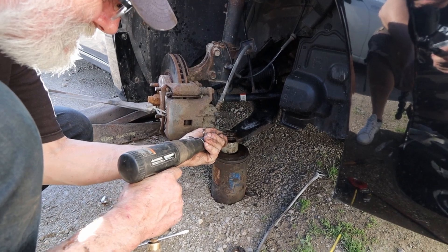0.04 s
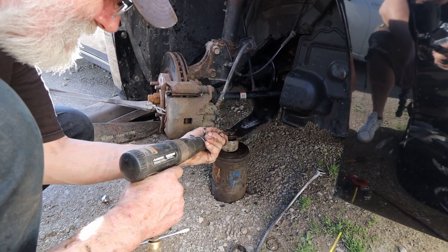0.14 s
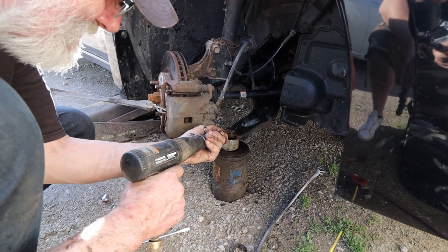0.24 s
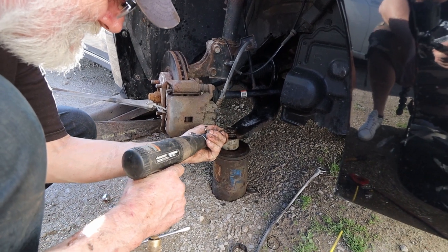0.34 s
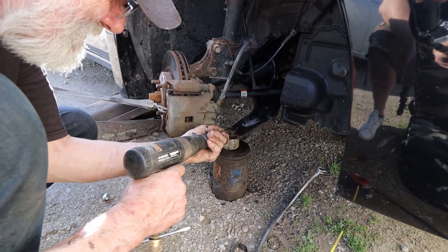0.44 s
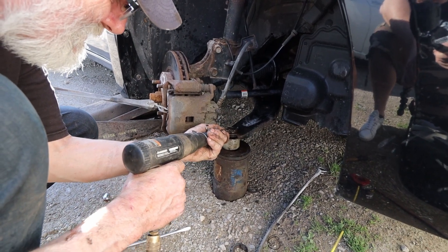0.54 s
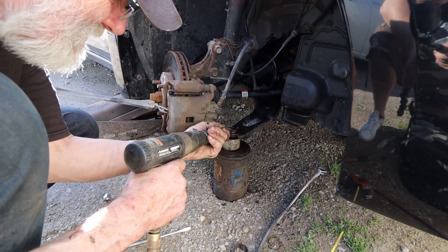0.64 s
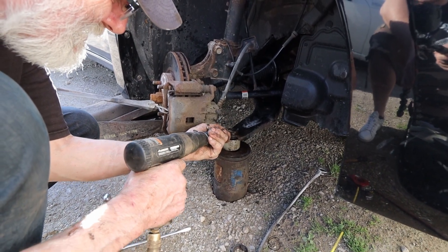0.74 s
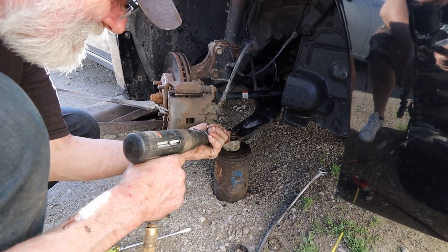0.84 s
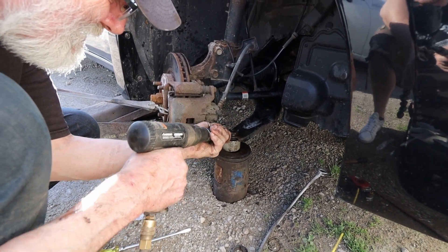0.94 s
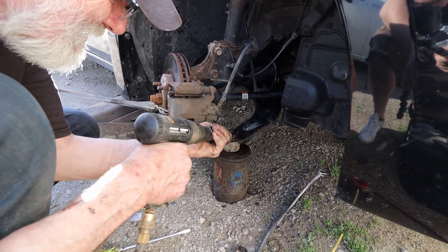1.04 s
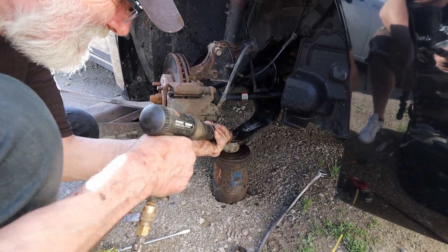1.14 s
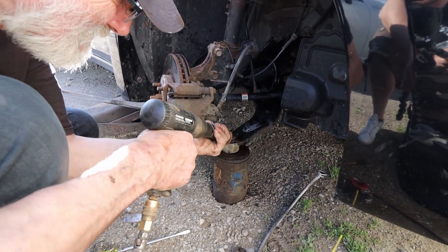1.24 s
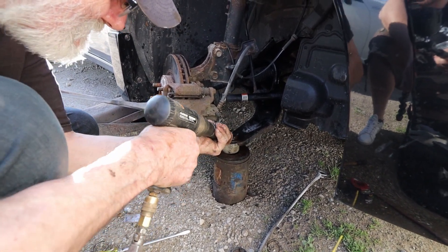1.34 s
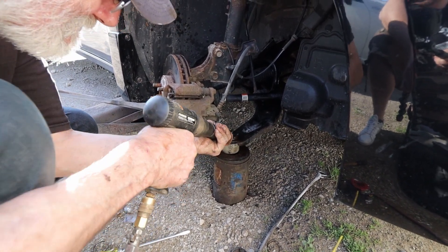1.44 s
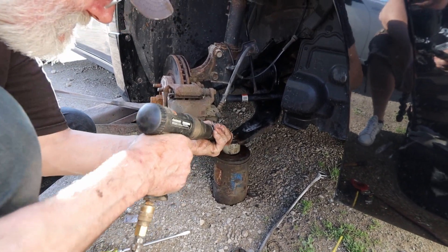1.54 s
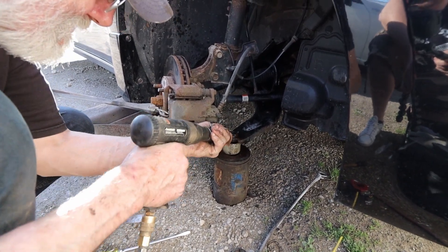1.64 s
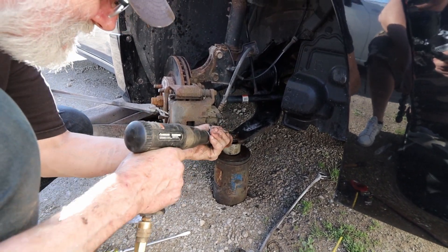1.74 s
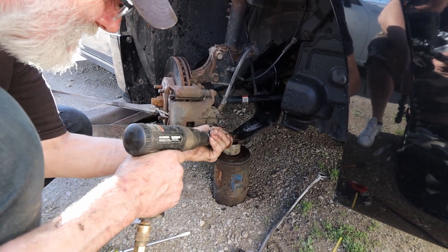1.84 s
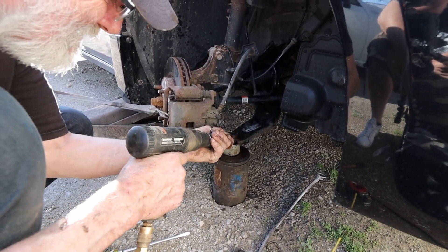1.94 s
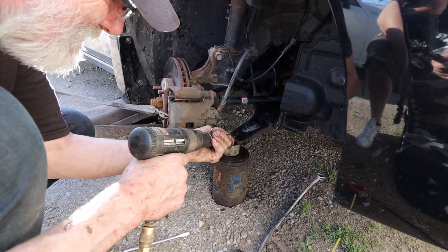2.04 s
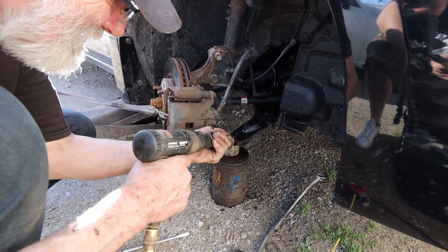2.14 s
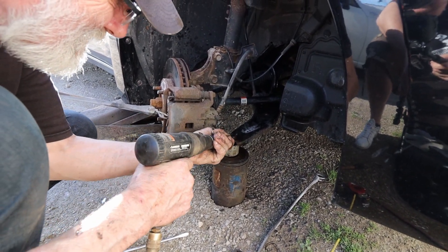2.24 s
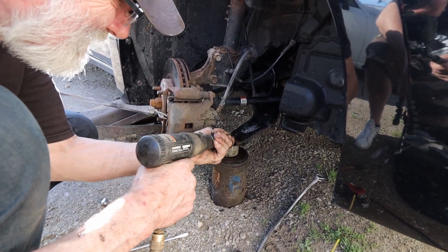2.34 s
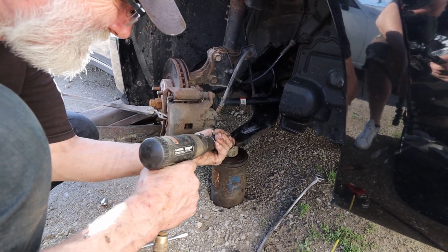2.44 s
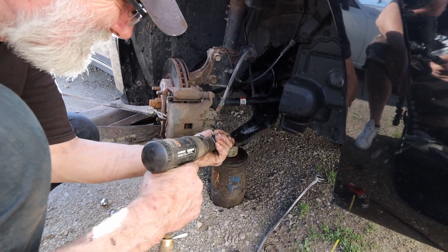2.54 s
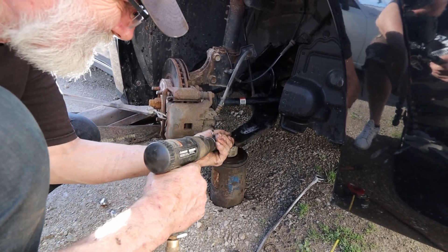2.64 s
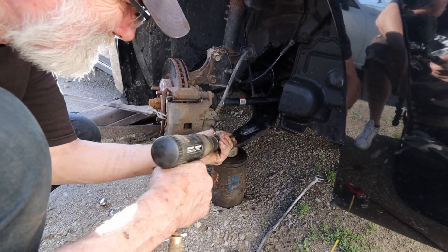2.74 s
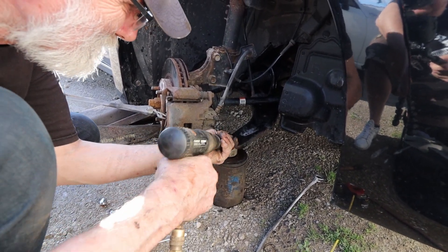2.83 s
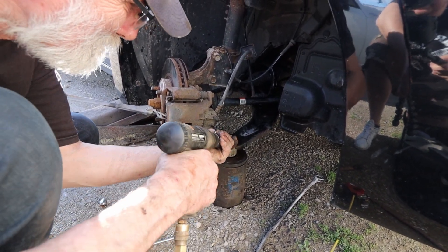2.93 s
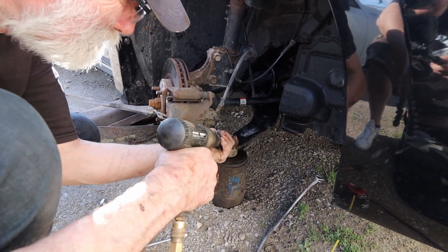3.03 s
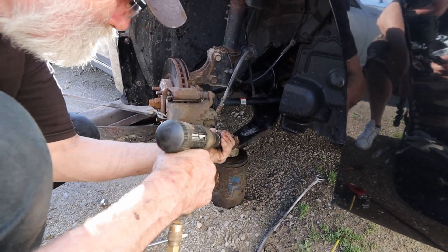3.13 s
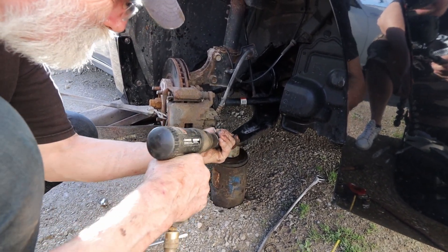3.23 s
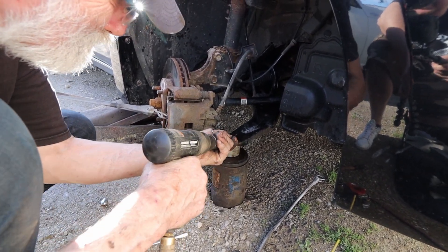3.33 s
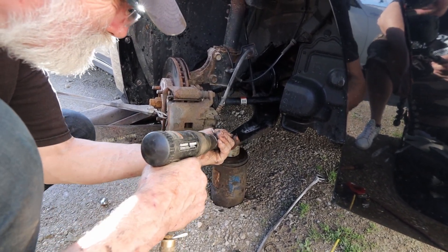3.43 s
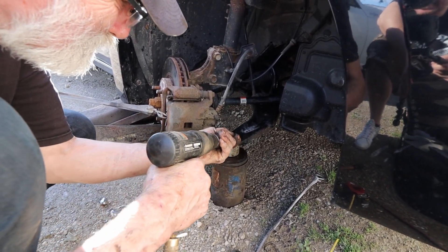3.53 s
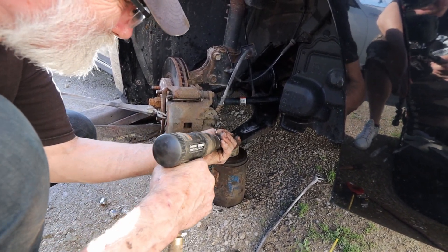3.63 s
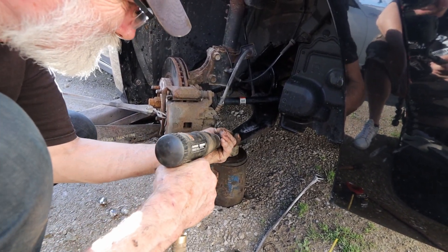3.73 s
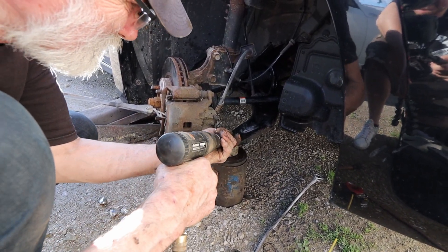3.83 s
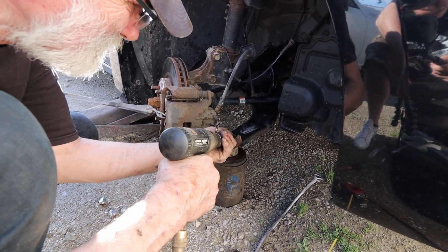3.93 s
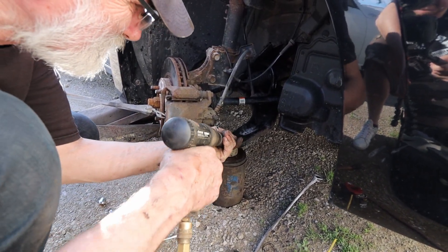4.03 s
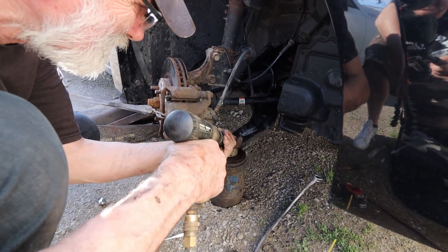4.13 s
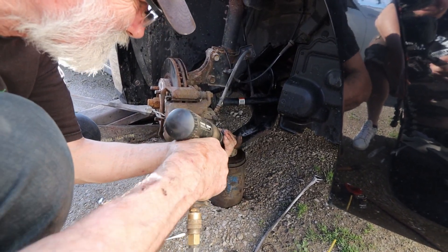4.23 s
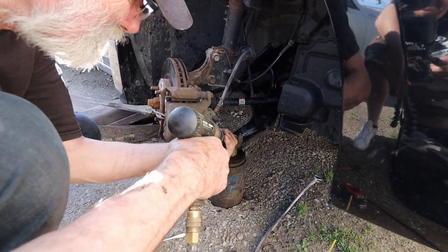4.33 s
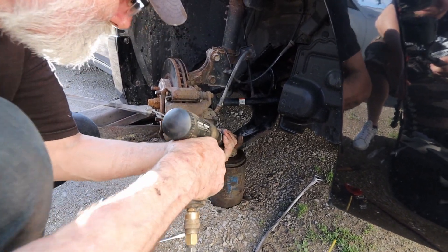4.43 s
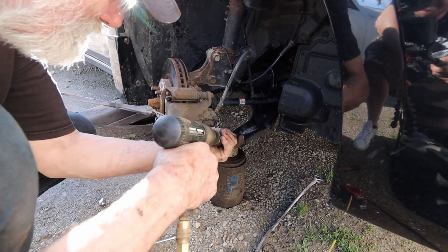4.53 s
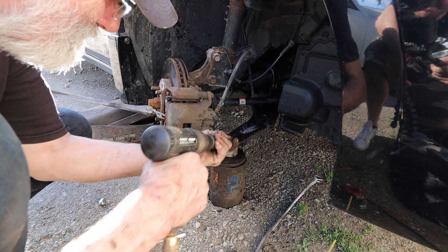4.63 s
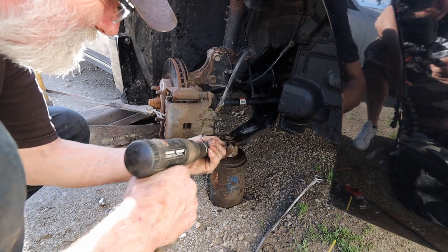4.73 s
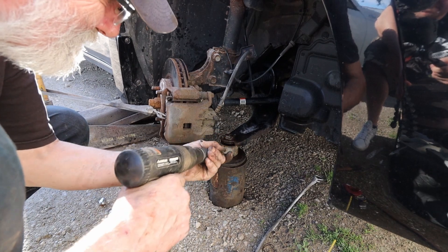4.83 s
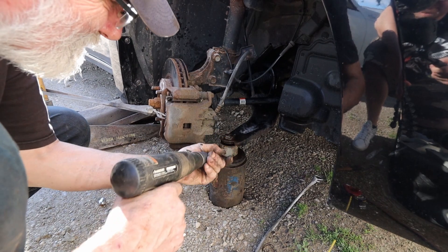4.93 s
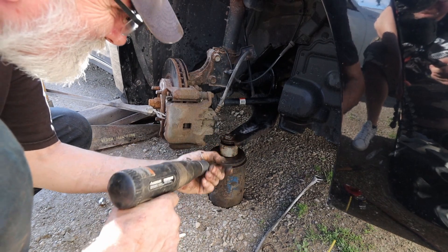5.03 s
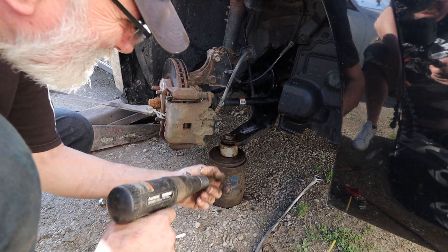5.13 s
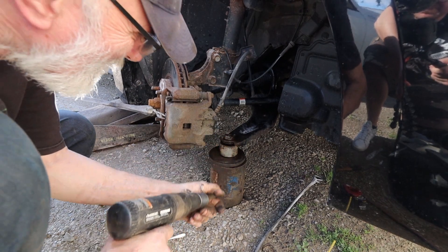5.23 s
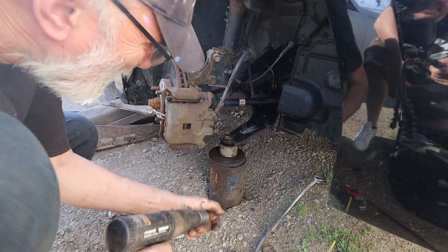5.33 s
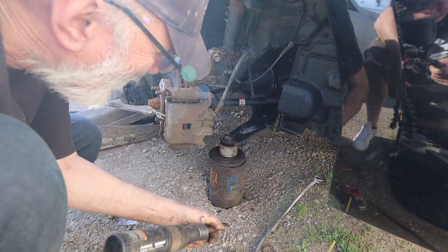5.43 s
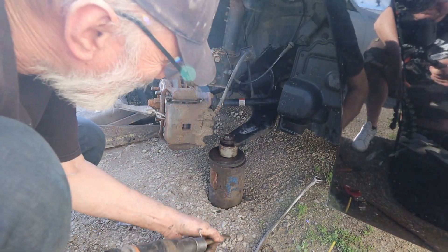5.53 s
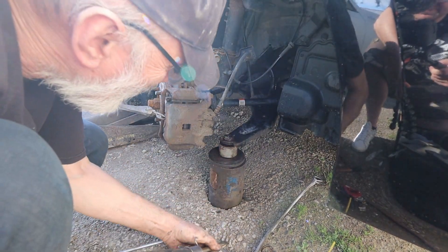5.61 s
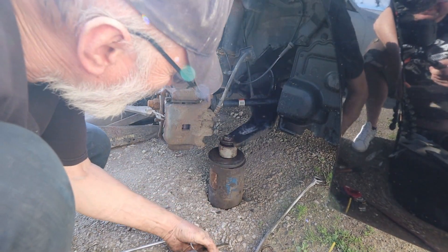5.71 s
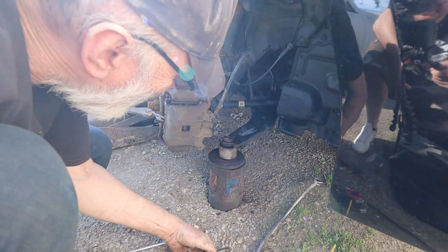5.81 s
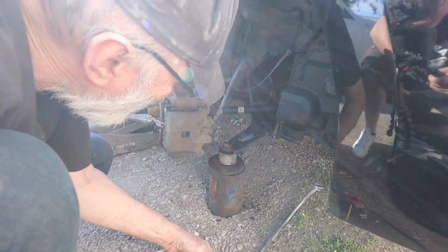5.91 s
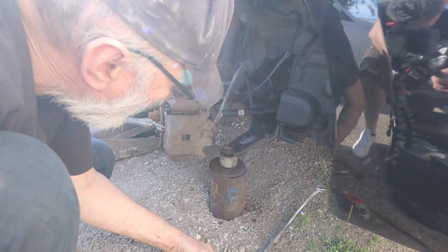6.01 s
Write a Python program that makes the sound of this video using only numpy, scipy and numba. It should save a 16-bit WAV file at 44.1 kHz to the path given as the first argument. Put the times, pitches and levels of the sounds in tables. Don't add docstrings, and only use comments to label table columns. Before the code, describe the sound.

An air hammer rattles harshly against a steel car part in three bursts of about a third of a second, each ending in brief ringing and an air sigh.

```python
import sys
import numpy as np
from scipy import signal
from scipy.fft import rfft, irfft
from scipy.io import wavfile
from scipy.ndimage import uniform_filter1d
from numba import njit

SR = 44100
rng = np.random.default_rng(int(sys.argv[2]) if len(sys.argv) > 2 else 0)


def transcribe(u):
    v = np.clip(np.atleast_2d(u).T, -1, 1)
    q = np.round(v * 32767).astype(np.int16)
    wavfile.write(sys.argv[1], SR, q)


def natural_amplitude(level_db):
    exponent = np.asarray(level_db, float) / 20
    return 10 ** exponent


N = 267669
T = np.arange(N) / SR

# hz, level_db (per Hz)
CLATTER = [(35, -49), (60, -26), (386, -5.5), (441, -14.5), (629, -11.5), (858, -31), (1140, 2),
           (1630, -1.5), (2780, -3.5), (3620, -4), (3960, 0), (4230, -2.5), (12000, -17), (15600, -62.5),
           (22000, -120)]
# hz, level_db (per Hz)
EXHAUST = [(240, -38.5), (400, -4), (785, -23.5), (2670, -10.5), (3110, -28), (4290, -11.5), (7230, -9),
           (8420, -0.5), (10900, -14), (12500, -4.5), (15500, -6)]
# start_s, peak_db, brightness_hz, contact_s
TAPS = [
    (0.4363, -26, 2720, 0.014),
    (0.776, -31.5, 2680, 0.0043),
    (0.9153, -20.5, 3100, 0.014),
    (1.841, -58, 3010, 0.02),
    (2.222, -65, 2970, 0.012),
    (3.7, -55.5, 2900, 0.01),
    (3.831, -56.5, 3000, 0.015),
]


def unit(x):
    return x / np.sqrt(np.mean(x ** 2))


def colour(x, table):
    hz, db = np.transpose(table)
    grid_hz = np.maximum(np.fft.rfftfreq(2048, 1 / SR), 1)
    cepstrum = irfft(np.log(natural_amplitude(np.interp(np.log(grid_hz), np.log(hz), db))))
    cepstrum[1:1024] *= 2
    cepstrum[1025:] = 0
    response = irfft(np.exp(rfft(cepstrum)))
    return signal.fftconvolve(x, unit(response) / np.sqrt(len(response)))[:len(x)]


def ring(x, hz, t60_s):
    r = np.exp(-np.log(1000) / (t60_s * SR))
    w = 2 * np.pi * hz / SR
    gain = np.sqrt(2 * (1 - r * r))
    return gain * signal.lfilter([0, r * np.sin(w)], [1, -2 * r * np.cos(w), r * r], x)


def swells(start_s, level_db, rise_s, fall_s):
    out = np.zeros(N)
    for s, gain, up, down in np.broadcast(start_s, natural_amplitude(level_db), np.abs(rise_s), np.abs(fall_s)):
        near = slice(max(int((s - 10 * up) * SR), 0), int((s + 10 * down) * SR))
        late = T[near] - s
        out[near] += gain * np.exp(np.where(late < 0, late / up, -late / down))
    return out


def strikes(start_s, level_db, shape):
    train = np.zeros(N)
    train[(np.asarray(start_s) * SR).astype(int)] = natural_amplitude(level_db)
    return signal.fftconvolve(train, shape)[:N]


def walk(rate_hz):
    hold = int(SR / rate_hz)
    steps = np.repeat(rng.standard_normal(N // hold + 1), hold)
    return uniform_filter1d(uniform_filter1d(steps, hold), hold)[:N]


def chatter(spread_db):
    return unit(rng.standard_normal(N) * natural_amplitude(spread_db * rng.exponential(size=N)))


@njit
def walls(x, lags, gain, damp):
    line, soft, out = np.zeros((8, 4096)), np.zeros(8), np.zeros(len(x))
    for i in range(len(x)):
        total = 0.
        for k in range(8):
            soft[k] += (1 - damp) * (gain[k] * line[k, (i - lags[k]) & 4095] - soft[k])
            total += soft[k]
        out[i] = soft[0] - soft[3] + soft[5] - soft[6]
        for k in range(8):
            line[k, i & 4095] = x[i] + soft[k] - total / 4
    return out


def echo(x, shortest, longest, t60_s, damp):
    lags = rng.integers(shortest, longest, size=8)
    return walls(x + 1e-18, lags, natural_amplitude(-60 * lags / SR / t60_s), damp)


def yard():
    # hz, level_db (per Hz)
    traffic = [(25, -4), (90, 5), (250, -1.5), (450, -10.5), (1000, -6.5), (2000, -18), (3000, -22),
               (4700, -26), (6300, -37.5), (8000, -33.5), (10500, -41), (13500, -42.5), (15500, -44.5)]
    # time_s, rumble_db
    gain_control = [(0, -43.5), (.6, -42), (.78, -39.5), (1.15, -38.5), (1.25, -60), (2.02, -63),
                    (2.46, -61.5), (2.87, -59), (2.97, -60), (4.14, -59), (4.24, -54), (5.3, -57),
                    (5.62, -55), (6.07, -51)]
    # peak_s, level_db, rise_s, fall_s
    leak_events = [
        (.0, -1, .1, 0.9),
        (2.6, 5, .15, 0.43),
        (3.55, -1, 0.082, 0.11),
        (4.1, 7.5, 0.051, 0.11),
        (4.901, 1, 0.18, .06),
        (5.601, 8, 0.11, 0.18),
    ]
    road_db, fine_db, coupling_leak_db = -2.5, -20, -29.5
    flicker_db, flicker_hz = 3.0, 11
    groups = np.zeros((3, N))
    hz_points, db_points = np.transpose(traffic)
    for hz in 30 * 2 ** np.arange(0, 9.2, 1 / 3):
        edges_hz = [hz / 1.123, min(hz * 1.123, 16500)]
        sos = signal.butter(2, edges_hz, "band", fs=SR, output="sos")
        band = signal.sosfilt(sos, rng.standard_normal(N))
        db = np.interp(np.log(hz), np.log(hz_points), db_points)
        db = db + flicker_db * min(700 / hz, 1) * walk(flicker_hz)
        groups[int(hz > 450) + int(hz > 2500)] += natural_amplitude(db) * band
    rumble, road, fine = map(unit, groups)
    leak = unit(colour(rng.standard_normal(N), EXHAUST))
    hiss = natural_amplitude(fine_db) * fine + natural_amplitude(coupling_leak_db) * leak
    leak_swells = 1 + swells(*np.transpose(leak_events))
    gain = natural_amplitude(np.interp(T, *np.transpose(gain_control)))
    return gain * (rumble + natural_amplitude(road_db) * road + leak_swells * hiss)


def scuffs():
    # start_s, peak_db, centre_hz, fall_s
    scrapes = [(0.433, -31.5, 1480, 0.016), (0.578, -43, 1500, .01), (0.755, -47.5, 1300, 0.0033),
               (0.92, -27.5, 8300, 0.0043), (0.922, -32, 1250, 0.024), (1.058, -39, 1390, 0.012),
               (1.134, -39, 1400, 0.027), (1.168, -27, 2480, 0.022), (1.185, -24, 810, 0.018),
               (2.225, -53.5, 1270, .02), (3.702, -53, 1400, 0.021), (3.707, -54.5, 2600, 0.015),
               (3.743, -60, 1500, 0.0087), (4.159, -37.5, 2706, 0.021), (4.915, -61, 1990, 0.016),
               (5.062, -65, 1500, 0.012), (5.699, -42, 5960, 0.01), (5.704, -40.5, 987, 0.0055),
               (5.869, -47, 12030, 0.0015), (5.871, -59, 5530, 0.015), (5.952, -53.5, 7900, 0.00081),
               (5.978, -43.5, 5966, 0.0025), (6.004, -36, 2910, 0.014), (6.035, -53, 1820, 0.024),
               (6.03, -45, 3520, 0.0485), (6.001, -51, 8660, 0.11)]
    # start_s, peak_db, fall_s
    thumps = [
        (0.462, -41, 0.047),
        (1.234, -15, 0.01),
        (1.639, -34.5, 0.016),
        (1.858, -62, 0.029),
        (2.25, -61, 0.022),
        (2.499, -56, 0.029),
        (2.929, -25, 0.022),
        (3.28, -37, 0.04),
        (4.239, -21, 0.016),
        (4.66, -39, 0.032),
    ]
    thump_hz = 300
    out, grit = np.zeros(N), chatter(3.3)
    for s, db, hz, fall_s in scrapes + [(s, db, thump_hz, fall_s) for s, db, fall_s in thumps]:
        near = slice(int((s - .01) * SR), int((s + 0.51) * SR))
        rub = (swells([s], db, .0007, fall_s) * grit)[near]
        scrape = ring(ring(rub, hz, 3 / hz), hz, 3 / hz)
        out[near] += natural_amplitude(9.0) * np.sqrt(hz / SR) * scrape
    return out


def steel(force, spot, free_db):
    modes_hz = [307, 770, 945, 1165, 1300, 1354, 1526, 1755, 2190, 2320, 2466, 2756, 3192, 3343, 3940, 4107,
                4460, 4620, 4855, 5179, 5346, 5662, 6298, 6988, 7620, 8640, 9049, 10300, 14110, 15330]
    # first_spot_db, second_spot_db, third_spot_db, free_t60_s
    mode_rows = [(2, -11.5, -7, 0.2), (-1.5, -0.5, -1.5, 0.52), (6, 4, -1.5, 0.25), (14.5, 13.5, 17, 0.1),
                 (-6, 3.5, 1, 0.3), (7, 9.5, 9, 0.2), (-1.5, 6.5, 8.5, 0.18), (6, 5.5, 7.5, 0.17),
                 (-2.5, -2, 3, 0.3), (-4.5, 0.5, 1.5, 0.19), (1, -0.5, 9, 0.23), (9.5, 7, 9.5, 0.25),
                 (-7.5, -2, 5, 0.3), (9, 7, 9, 0.28), (10, 7.5, 16, 0.14), (-7, 4.5, -7, 0.28),
                 (2.5, -0.5, -1, 0.2), (3, 4, 5, 0.2), (6, 7.5, -2, 0.26), (-10.5, -3, 3, 0.69),
                 (-5, 1.5, -1, 0.23), (10.5, 13.5, 12, 0.17), (6, 5.5, -6.5, 0.26), (-14, -3, -2, 0.2),
                 (6, 5, 11, 0.36), (-1.5, -4.5, -1, 0.19), (0, 1, 3, 0.25), (-5, -10, -0.5, 0.15),
                 (-6.5, 0.5, 4, 0.3), (-1.5, 1, -2, 0.15)]
    pressed_t60_s = .075
    out = 0
    for hz, row in zip(modes_hz, mode_rows):
        pressed = ring(force, hz, pressed_t60_s)
        free = ring(force, hz, row[-1])
        out = out + natural_amplitude(row[spot]) * (pressed + natural_amplitude(free_db) * free)
    return out


def taps():
    grit = chatter(1.5)
    force, bright = np.zeros(N), np.zeros(N)
    for s, db, hz, contact_s in TAPS:
        touch = swells([s], db, 0.0018, contact_s) * grit
        bright += touch * (hz / 6000) ** 2
        soften = signal.butter(2, np.clip(hz, 500, 15000), fs=SR, output="sos")
        force += signal.sosfilt(soften, touch)
    out = natural_amplitude(-1) * colour(force, CLATTER)
    out += natural_amplitude(-33) * steel(force, 0, free_db=-21)
    return out + natural_amplitude(-18.5) * colour(bright, EXHAUST)


def clinks():
    # mode_hz, level_db, t60_s
    tip_modes = [(1300, -1, 0.19), (1760, -0.5, 0.19), (2740, -1.5, .11), (3300, -4, 0.073),
                 (4000, -8, 0.069), (4070, -2, 0.1), (4670, -11, .1)]
    # mode_hz, level_db, t60_s
    flank_modes = [(780, -7, 0.23), (1240, -3.5, 0.12), (1400, -1, .1), (2520, -6, 0.086), (2770, -4, .12),
                   (3200, -7, .17), (3850, -6.5, .14), (4118, -2, 0.062)]
    tip_db, flank_db = -31.5, -22.5
    out = np.zeros(N)
    for s, db, modes in ((TAPS[0][0], tip_db, tip_modes), (TAPS[2][0], flank_db, flank_modes)):
        late = np.maximum(T - s, 0)
        onset = 1 - np.exp(-late / .004)
        top_db = max(row[1] for row in modes)
        for hz, mode_db, t60_s in modes:
            decay = natural_amplitude(db + mode_db - top_db - 60 * late / t60_s)
            out += decay * onset * np.sin(2 * np.pi * hz * late)
    return out


def valve():
    # start_s, level_db, rise_s, fall_s
    breaths = [
        (1.222, -4.5, .004, .02),
        (1.2341, -9, .0004, 0.0051),
        (1.646, -40, .001, 0.0088),
        (2.9136, -23.5, .0025, 0.035),
        (3.29, -37.5, .002, 0.014),
        (3.352, -35.5, .0007, .007),
        (4.2231, -22, .002, .03),
        (4.673, -34.5, 0.002, .012),
    ]
    return colour(swells(*np.transpose(breaths)) * rng.standard_normal(N), EXHAUST)


def free_bit():
    # mode_hz, t60_s, first_pull_db, second_pull_db, third_pull_db
    bit_modes = [(5180, 0.3, -40, -25.5, -29), (14290, 0.15, -40, -46, -43.5),
                 (1180, 0.21, -22.5, -26, -20.5), (3900, 0.84, -68, -57.5, -51.5),
                 (2736, 0.9, -65.5, -58, -49), (5189, 0.77, -62.5, -54.5, -63), (1852, 0.17, -41, -55, -42),
                 (1172, 0.74, -45.5, -43, -42.5)]
    lifts_s = [
        1.606,
        3.258,
        4.618,
    ]
    wobble = natural_amplitude(2.5 * walk(40))
    out = np.zeros(N)
    for hz, t60_s, *levels_db in bit_modes:
        tone = np.sin(2 * np.pi * hz * T) * wobble
        for s, db in zip(lifts_s, levels_db):
            late = np.maximum(T - s, 0)
            out += natural_amplitude(db) * (1 - np.exp(-late / 0.0042)) * natural_amplitude(-60 * late / t60_s) * tone
    return out


def blows(first_s, start_s, stop_s, last_s, first_db, last_db, puff_kick_db, thud_kick_db, puff_db, thud_db):
    stroke_s, jitter_s, scatter_db = .0235, .0002, .5
    run_db, sag_db_per_s = -1.5, 9.5
    surge_db, surge_s = 5, .05
    puff_settle_s, thud_settle_s, last_puff_db = .03, 0.017, -24
    run = np.linspace(start_s, stop_s, round((stop_s - start_s) / stroke_s) + 1)
    chance = rng.standard_normal((4, len(run) + 2))
    s = np.r_[first_s, run + jitter_s * chance[0, 2:], last_s]
    age = s - first_s
    run_peak = run_db - sag_db_per_s * (run - start_s)
    run_peak += surge_db * np.exp((start_s - run) / surge_s) + scatter_db * chance[1, 2:]
    peak = np.r_[first_db, run_peak, last_db]
    puff = puff_db + puff_kick_db * np.exp(-age / puff_settle_s) + scatter_db * chance[2]
    puff[-1] = last_db + last_puff_db
    thud = thud_db + thud_kick_db * np.exp(-age / thud_settle_s) + scatter_db * chance[3]
    return s, peak, puff, thud


def chisel():
    # first_blow_s, run_start_s, run_stop_s, last_blow_s
    bursts = [
        (1.2352, 1.2605, 1.5664, 1.5968),
        (2.9284, 2.9530, 3.2364, 3.2874),
        (4.2400, 4.2635, 4.5700, 4.6084),
    ]
    # first_blow_db, last_blow_db, puff_surplus_db, thud_surplus_db, settled_puff_db
    pulls = [
        (5.5, -5, 3.5, 7.5, -21.5),
        (-5, -20.5, 8.5, 3, -22),
        (-2.5, -7, 8, 7, -20),
    ]
    grip_thuds_db = [-35, -33.5, -36.5]
    # mode_hz, t60_s
    panels = [(125, .08), (300, .025), (530, .04)]
    out, t = np.zeros(N), T[:SR // 10]
    bounce = (1 - np.exp(-t / 0.0079)) * np.exp(-t / 0.011) * 1.274
    recoil = t / 0.00019 * np.exp(-t / 0.00021) - .5 * t / 0.0047 * np.exp(-t / 0.00067)
    quick = signal.butter(2, 700, "high", fs=SR, output="sos")
    for spot, (times, pull) in enumerate(zip(bursts, pulls)):
        s, peak_db, puff_db, thud_db = blows(*times, *pull, grip_thuds_db[spot])
        habit = strikes(s, peak_db, bounce * chatter(1.0)[:len(t)])
        fresh = signal.sosfilt(quick, strikes(s, peak_db, bounce) * chatter(1.0))
        out += natural_amplitude(-6) * colour(.65 * habit + .78 * fresh, CLATTER)

        knock = signal.sosfilt(quick, strikes(s + .001, peak_db + 16, np.exp(-t / .00002)))
        force = 0.76 * fresh + .75 * signal.sosfilt(quick, habit) - .75 * knock
        out += natural_amplitude(-30) * steel(force, spot, free_db=-19)

        puff = swells(s + .001, puff_db + 2, 0.00064, 0.0093)
        out += colour(puff * rng.standard_normal(N), EXHAUST)

        thud = strikes(s, thud_db + 16.5, recoil)
        out += natural_amplitude(-11) * thud + natural_amplitude(-24.0) * sum(ring(thud, hz, t60_s) for hz, t60_s in panels)
    return out


def scene():
    near = scuffs() + taps() + clinks() + valve() + free_bit() + chisel()
    near = signal.sosfilt(signal.butter(3, 85, "high", fs=SR, output="sos"), near)
    arch = echo(near, 300, 2400, t60_s=0.19, damp=0.74)
    sheds = echo(near, 1800, 4000, t60_s=0.83, damp=0.54)
    return (near + natural_amplitude(-0.5) * arch + natural_amplitude(-27) * sheds + yard())[None]


def thin_to_tones(x, s, size=1400):
    near = slice(int(s * SR) - size // 2, int(s * SR) + size // 2)
    fade = np.hanning(size)
    lines = rfft(x[near] * fade)
    tones = np.zeros_like(lines)
    edges = np.cumsum(np.arange(11, 48)) - 11
    for lo, hi in zip(edges[1:-1], edges[2:]):
        if hi < len(lines):
            k = lo + np.argmax(np.abs(lines[lo:hi]))
            phase = lines[k] / np.abs(lines[k])
            tilt = natural_amplitude(7.0 - 12 * lo / len(lines))
            tones[k] = phase * np.linalg.norm(lines[lo:hi]) * tilt
    change = np.zeros(N)
    change[near] = fade * (irfft(tones, size) - x[near])
    return change


def band_limit(x):
    return signal.sosfilt(signal.butter(12, 15690, fs=SR, output="sos"), x)


def record(dry):
    # centre_s, depth (0-1)
    thinned = [
        (1.445, .75),
        (1.488, .75),
        (2.982, .95),
        (3.149, .75),
        (3.278, .8),
        (4.515, .8),
    ]
    heard = np.clip(dry[0], -.97, .97)
    heard = heard + sum(depth * thin_to_tones(heard, s) for s, depth in thinned)
    top_cut = signal.ellip(10, .2, 60, 15780, fs=SR, output="sos")
    mix = signal.sosfilt(top_cut, heard)[None]
    return band_limit(mix)


dry = scene()
out = record(dry)
transcribe(out)
```